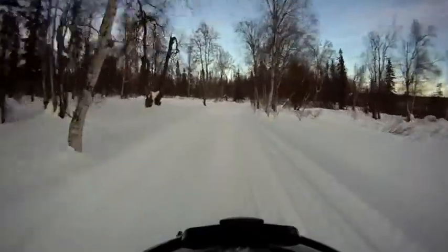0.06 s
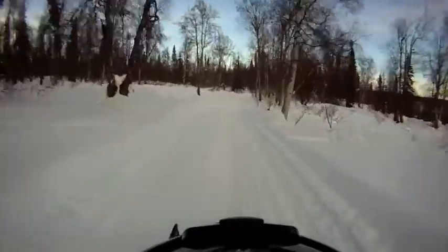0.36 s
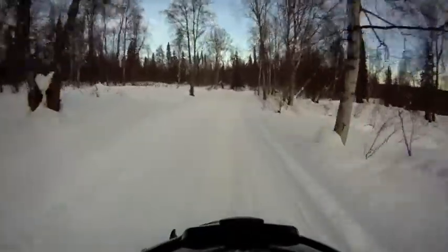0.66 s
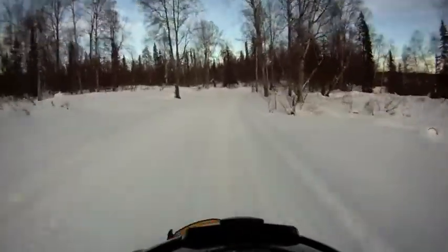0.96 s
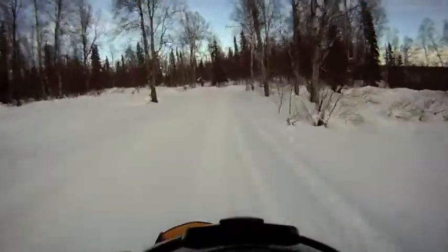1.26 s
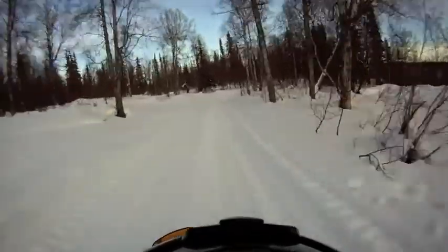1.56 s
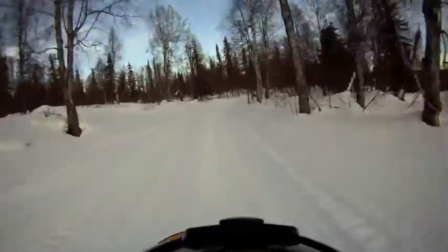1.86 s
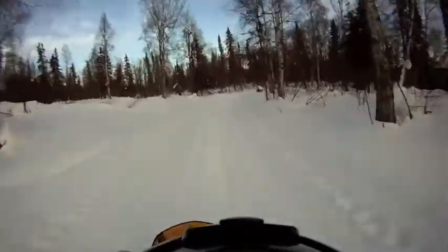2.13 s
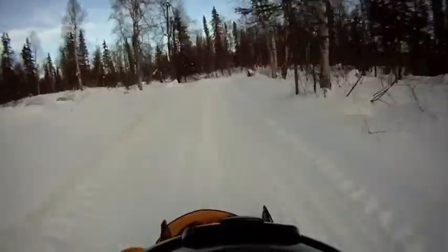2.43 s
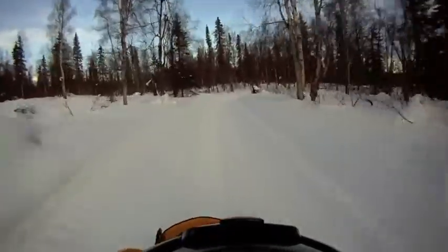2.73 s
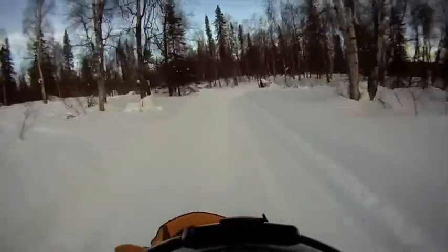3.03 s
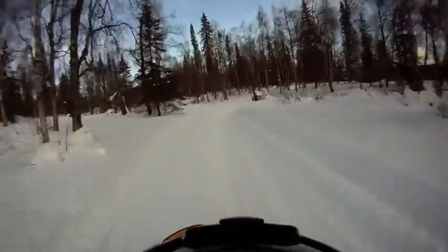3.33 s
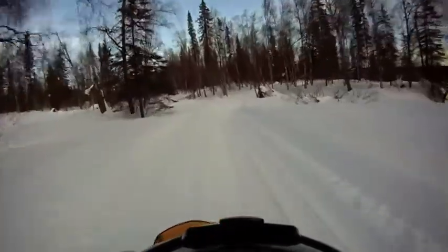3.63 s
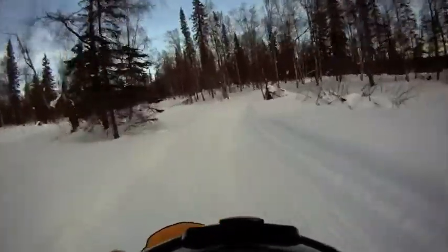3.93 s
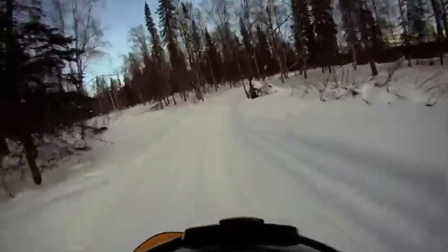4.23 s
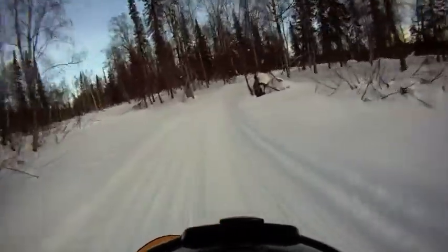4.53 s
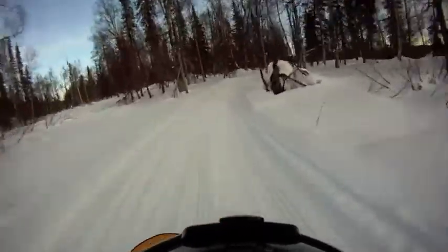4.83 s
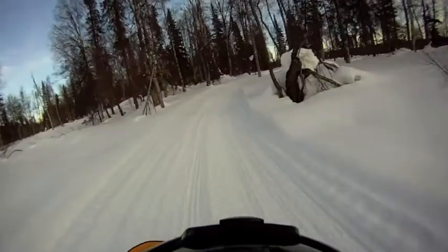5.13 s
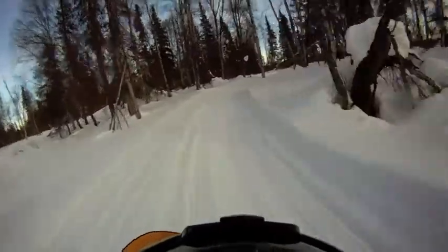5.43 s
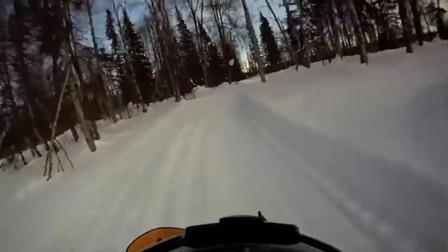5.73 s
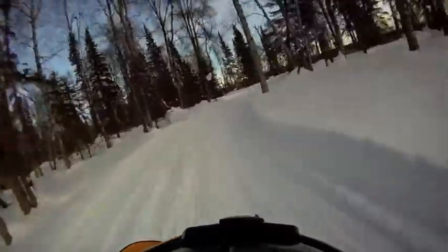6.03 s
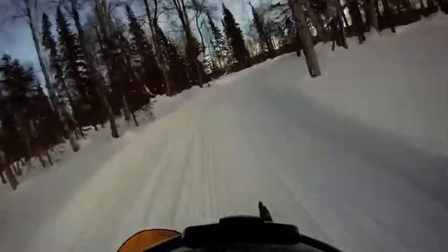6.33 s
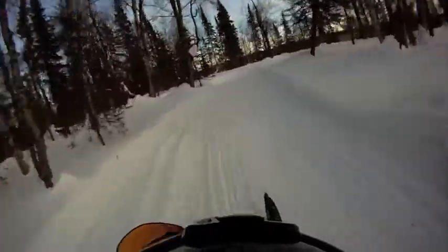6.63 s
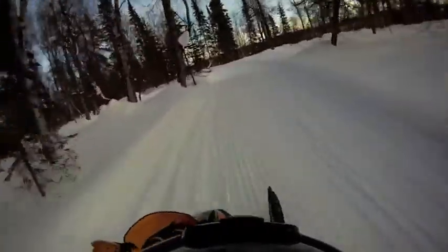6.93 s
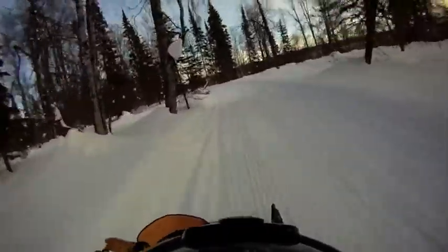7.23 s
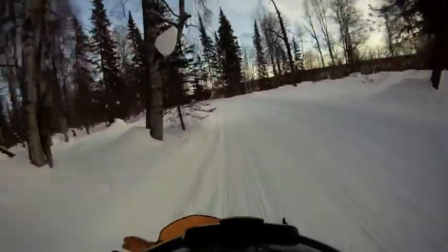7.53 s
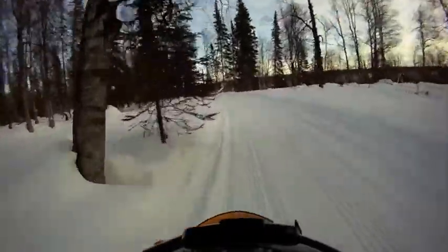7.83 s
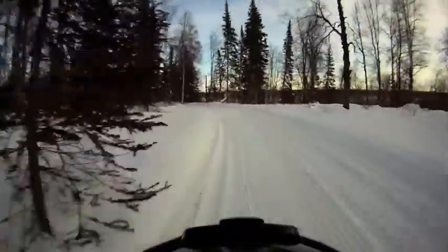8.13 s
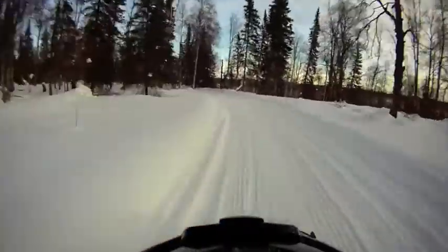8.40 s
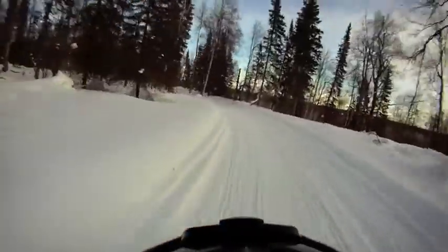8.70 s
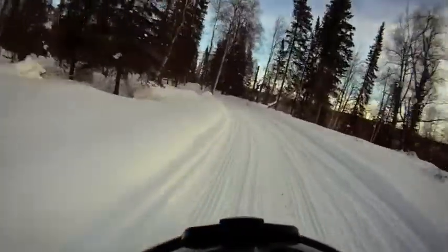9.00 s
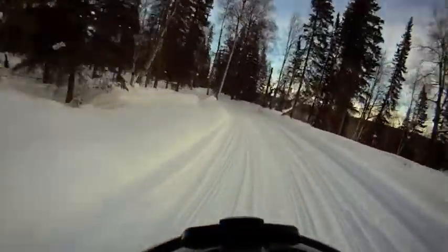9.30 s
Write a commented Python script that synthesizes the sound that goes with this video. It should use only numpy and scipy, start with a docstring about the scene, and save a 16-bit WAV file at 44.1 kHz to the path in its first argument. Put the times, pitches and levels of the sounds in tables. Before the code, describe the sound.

A snowmobile is already at trail speed, heard close from the rider's seat. The rubber track drones and the two-stroke engine buzzes, their tones beating against each other, inside a roar of churned snow and low wind buffeting. A thin hiss and sizzle lie on top throughout. Dull bumps thump the microphone irregularly from the start until about 6 seconds. The pitch sinks slowly, then faster from about 5 seconds as the machine slows for a bend, reaching its lowest near 7 seconds. The hood gives low booms around 4.8, 5.6 and 6.8 seconds, and the chassis and skis knock briefly near 5.4 and 7 seconds. Then the throttle opens, with one short intake snarl at about 7.5 seconds. The engine turns raspier and climbs in pitch, and the machine runs on, slower than at first and with lighter wind, until about 9.5 seconds.

```python
"""Track drone, two-stroke buzz and a roar of wind and snow: a snowmobile, heard from the rider's seat.
It runs along a packed forest trail, slows for a bend, then pulls away with one intake snarl.
Rubber track and engine each make a series of tones, beating where they cross.
Bumps thump the camera, the hood booms, chassis and skis knock.
The small camera samples at 12 kHz and holds each sample, which adds a thin sizzle."""
import sys
import numpy as np
from scipy import signal
from scipy.fft import rfft, irfft, next_fast_len
from scipy.io import wavfile

SR = 44100
rng = np.random.default_rng(int(sys.argv[2]) if len(sys.argv) > 2 else 0)


def wrap_up_sound(samples):
    """Save the sound to the file named by the first command line argument, as 16-bit audio."""
    columns = np.atleast_2d(samples).T
    # keep every value between -1 and 1, then stretch to whole-number steps
    tamed = np.clip(columns, -1, 1)
    steps = np.round(tamed * 32767).astype(np.int16)
    wavfile.write(sys.argv[1], SR, steps)


N = 417170
TIME_S = np.arange(N) / SR
CRUISE_LUG_HZ = 145

# track speed (time [s], lug rate [Hz])
LUG_RATE = [(0.0, 155.0), (0.4, 153.0), (1.17, 148.8), (2.15, 145.5), (3.15, 139.4), (3.71, 132.6),
            (4.59, 129.2), (5.01, 124.2), (5.57, 113.0), (6.53, 99.0), (6.92, 90.8), (7.1, 89.8),
            (7.35, 91.0), (8.52, 103.9), (8.71, 104.6), (9.46, 106.8)]
# engine speed (time [s], crank rate [Hz])
CRANK_RATE = [(0.0, 106.8), (0.61, 102.8), (1.21, 101.0), (2.1, 102.1), (3.19, 100.5), (3.48, 95.1),
              (3.84, 97.3), (4.55, 96.8), (5.46, 87.4), (6.22, 90.6), (6.35, 89.8), (6.95, 81.8),
              (7.2, 87.9), (7.35, 89.6), (7.67, 97.0), (8.35, 100.0), (9.03, 96.3), (9.46, 96.1)]
# cruise, coast, open up (time [s], throttle [0-1])
THROTTLE = [(0.0, 0.08), (3.0, 0.37), (4.6, 0.18), (5.2, 0.04), (6.3, 0), (6.92, 0.5), (7.6, 0.98),
            (8.3, 0.7), (9.46, 0.57)]
# track overtones (multiple of lug rate [-], level [dB])
TRACK_ORDERS = [(3, -16), (5, -4.5), (6, 0.5), (7, -6.5), (8, -10.5), (9, -13.5)]
# body resonances (frequency [Hz], gain [dB])
TUNNEL_RESPONSE = [(90, -12), (125, -1.5), (150, 4), (300, 7.5), (520, 1), (655, 2.5), (715, -14),
                   (820, -13), (920, -12), (1400, -19.5)]
CHASSIS_RESPONSE = [(165, -3), (183, -6.5), (198, 0.5), (215, -2.5), (237, -6), (262, -3), (310, -9.5),
                    (360, -9), (410, -4.5), (465, -15.5), (497, -3), (530, -18), (565, -11.5), (610, -7)]
PIPE_RESPONSE = [(95, -4), (290, -14), (390, -6.5), (420, 6), (490, -5.5), (585, 4), (680, -15), (780, -20)]
RASP_RESPONSE = [(780, 0), (900, 5), (1060, -13), (1230, 0), (1480, -5.5), (1620, -11), (1790, -3),
                 (1900, -22), (2100, -1.5), (2350, -12.5), (2700, -5.5), (2920, -8.5), (3150, -14)]
AIRBOX_RESPONSE = [(720, -14), (850, -7), (930, 1), (980, 0), (1050, -19), (1290, -15), (1400, -28),
                   (1540, -20), (1700, -28), (1850, -21), (2100, -23), (2650, -29), (2900, -15),
                   (3150, -32)]
# exhaust rasp (time [s], level [dB])
RASP_LEVEL = [(0.0, -42), (3.0, -50), (4.4, -47), (6.8, -45), (7.5, -38.5), (7.9, -41.5), (8.4, -41.5),
              (8.8, -48), (9.46, -46)]
# noise spectra (frequency [Hz], relative density [dB])
WIND_SPECTRUM = [(12, -21), (25, -2), (50, 4), (75, 5.5), (130, 0), (220, -3.5), (400, -39.5)]
SNOW_SPECTRUM = [(70, -15), (130, 0.5), (200, 0.5), (330, 2.5), (420, 2.5), (520, 1.5), (620, -1),
                 (720, -6.5), (850, -16), (1050, -22.5), (1500, -39.5)]
HISS_SPECTRUM = [(600, -15.5), (1000, -4.5), (1270, -4), (1600, -6.5), (1900, -0.5), (2060, -10),
                 (2300, -4), (2800, 1), (3350, -11), (3700, -8.5), (4300, -18.5), (4800, -14),
                 (5600, -21.5), (6500, -1.5)]
# swells and dips in the snow roar, hiss and wind
# (time [s], snow and hiss gain [dB], wind gain [dB], half length [s])
SURGES = [(0.126, 1.5, -5, 0.17), (1.6, 2, 0, 0.084), (2.937, 4, 3, 0.041), (3.2, -0.5, 4.5, 0.13),
          (4.453, 0, 0, 0.28), (5.197, 2.5, 3.5, .18), (5.906, 2, 3, 0.24), (7.345, 3, 1, 0.41),
          (8.5, -2, -2, .6)]
# hood booms (time [s], level [dB], half length [s])
HOOD_BOOMS = [(1.206, -26, 0.15), (4.777, -21, 0.11), (5.56, -17.5, .22), (6.807, -18.5, 0.14),
              (7.36, -25, 0.17), (9.4, -25, 0.086)]
# trail bumps (time [s], peak [dB])
BUMPS = [(.311, -1), (.335, -2), (.924, -5), (1.274, 0), (1.77, -5), (2.355, -2.5), (3.043, -2.5),
         (3.097, -2), (3.305, -3), (4.082, -2.5), (5.362, -2), (5.946, -2)]
# chassis and ski knocks (time [s], level [dB], ring [Hz], width [Hz], half length [s])
KNOCKS = [(4.45, -48, 2200, 700, .2), (5.335, -46, 2800, 1800, .025), (5.357, -31, 2700, 1400, .005),
          (5.358, -46, 5300, 700, .005), (6.53, -51, 5200, 1500, .003), (6.962, -33, 1580, 300, .006),
          (6.96, -32, 2450, 1100, .004), (7.85, -44, 2200, 250, .07)]


def from_db(db):
    """Decibels to gain."""
    return 10 ** (np.asarray(db) / 20)


def unit_rms(x):
    """Scale to rms 1."""
    return x / np.sqrt(np.mean(x ** 2) + 1e-20)


def curve(points):
    """Time table read at every sample."""
    return np.interp(TIME_S, *np.transpose(points))


def db_at(points, hz):
    """Spectrum read on a log-frequency axis."""
    points_hz, db = np.transpose(points)
    return np.interp(np.log(hz), np.log(points_hz), db)


def swell(at_s, half_s):
    """Gaussian rise and fall, height 1."""
    return np.exp(-((TIME_S - at_s) / half_s) ** 2)


def drift(rate_hz):
    """Smooth random wander, rms 1."""
    hop, settle = 40, 2000
    pole = np.exp(-2 * np.pi * rate_hz * hop / SR)
    white = rng.standard_normal(N // hop + settle + 2)
    slow = signal.lfilter([1], [1, -2 * pole, pole * pole], white)[settle:]
    return np.interp(np.arange(N) / hop, np.arange(len(slow)), unit_rms(slow))


def noise(spectrum):
    """Shaped noise, rolled off above the last point; rms 1."""
    size = next_fast_len(N)
    hz = np.maximum(np.arange(size // 2 + 1) * SR / size, 1)
    gain = from_db(db_at(spectrum, hz)) * np.minimum(1, spectrum[-1][0] / hz) ** 2
    return unit_rms(irfft(rfft(rng.standard_normal(size)) * gain, size)[:N])


def resonant_noise(hz, width_hz):
    """Noise twice through one resonance; rms 1."""
    radius = np.exp(-np.pi * width_hz / SR)
    section = [1, 0, -1, 1, -2 * radius * np.cos(2 * np.pi * hz / SR), radius * radius]
    return unit_rms(signal.sosfilt([section, section], rng.standard_normal(N)))


def phase_rad(hz, wobble, wobble_hz):
    """Running phase of a slightly unsteady rate."""
    return 2 * np.pi * np.cumsum(hz * (1 + wobble * drift(wobble_hz))) / SR


def tone(rad, rough, flutter_hz):
    """One partial, fluttering in level and phase; rms 1."""
    rad = rad + rng.uniform(0, 2 * np.pi)
    in_phase = (1 + rough * drift(flutter_hz)) * np.sin(rad)
    quadrature = rough * drift(flutter_hz) * np.cos(rad)
    return (in_phase + quadrature) / np.sqrt(.5 + rough ** 2)


def partials(rad, hz, orders, response, rough):
    """Harmonics (multiple, level [dB]) weighted by a body's response; rms 1."""
    return unit_rms(sum(from_db(db + db_at(response, k * hz)) * tone(k * rad, rough, flutter_hz=13)
                        for k, db in orders))


def track(lug_hz, throttle):
    """Lugs slap over the wheels; tunnel and chassis lift tones that pass their resonances."""
    rad = phase_rad(lug_hz, wobble=.0012, wobble_hz=5.2)
    slap_db = -27.5 + db_at(TUNNEL_RESPONSE, lug_hz)
    drone_db = -17.5 + 3 * throttle + db_at(CHASSIS_RESPONSE, 2 * lug_hz)  # grows with load
    whine_db = -14.5 - 4.5 * throttle + db_at(CHASSIS_RESPONSE, 4 * lug_hz)  # taut belt rings less
    rattle_db = -28.5 - 10.5 * throttle - 8 * np.log2(lug_hz / CRUISE_LUG_HZ)  # fast belt rattles less
    slap = from_db(slap_db) * tone(rad, rough=.35, flutter_hz=9.2)
    drone = from_db(drone_db) * tone(2 * rad, rough=.075, flutter_hz=6.6)
    whine = from_db(whine_db) * tone(4 * rad, rough=.23, flutter_hz=5)
    rattle = from_db(rattle_db) * partials(rad, lug_hz, TRACK_ORDERS, TUNNEL_RESPONSE, rough=.22)
    return slap + drone + whine + rattle


def engine(crank_rad, crank_hz, throttle):
    """Two firings a turn make the main tone; the exhaust pipe adds low harmonics and a rasp."""
    low = [(k, 0) for k in (1, 3, 4, 5, 6, 7)]
    high = [(k, 0) for k in range(8, 35)]
    firing_db = -28.5 + 9.5 * throttle + db_at(CHASSIS_RESPONSE, 2 * crank_hz)
    firing = from_db(firing_db) * tone(2 * crank_rad, rough=.15, flutter_hz=8)
    pipe = from_db(-29 + 11 * throttle) * partials(crank_rad, crank_hz, low, PIPE_RESPONSE, rough=.29)
    rasp = from_db(curve(RASP_LEVEL)) * partials(crank_rad, crank_hz, high, RASP_RESPONSE, rough=.25)
    return firing + pipe + rasp


def wind(speed_octaves):
    """Air buffets the microphone, harder with speed."""
    surge_db = sum(db * swell(at_s, half_s) for at_s, _, db, half_s in SURGES)
    return from_db(-21.5 + 9 * speed_octaves + surge_db + .65 * drift(6.2)) * noise(WIND_SPECTRUM)


def snow(speed_octaves, surge_db):
    """Churned snow roars under the track."""
    return from_db(-19 + 4.5 * speed_octaves + surge_db + 1.45 * drift(12)) * noise(SNOW_SPECTRUM)


def machinery_hiss(crank_rad, speed_octaves, surge_db):
    """Machinery hisses, throbbing once a turn; a panel rings in it."""
    panel = from_db(-12) * resonant_noise(hz=2056, width_hz=140)
    gain_db = -38.5 + 4 * speed_octaves + surge_db + .88 * drift(21)
    throb = 1 + .083 * np.cos(crank_rad)
    return from_db(gain_db) * (noise(HISS_SPECTRUM) + panel) * throb


def hood(hum_db=-34.5):
    """One low hood resonance hums and swells into booms."""
    booms = sum(from_db(db) * swell(at_s, half_s) for at_s, db, half_s in HOOD_BOOMS)
    return (from_db(hum_db) + booms) * resonant_noise(hz=96.3, width_hz=19.4)


def bumps(push_s=.0018):
    """Each bump gives the microphone one dull push, with a slight undershoot either side."""
    return sum(from_db(db) * (1 - ((TIME_S - at_s) / push_s) ** 2) * swell(at_s, push_s)
               for at_s, db in BUMPS)


def knocks():
    """Chassis and skis knock and scrape: noise bursts, one resonance each."""
    return sum(from_db(db) * swell(at_s, half_s) * resonant_noise(hz, width_hz)
               for at_s, db, hz, width_hz, half_s in KNOCKS)


def intake_snarl(crank_rad, crank_hz, at_s=7.46, hold_s=.14, rise_db_per_s=46, fall_db_per_s=129):
    """High crank harmonics through the airbox swell once near full throttle, hold and drop."""
    before_s = np.maximum(at_s - TIME_S, 0)
    after_s = np.maximum(TIME_S - at_s - hold_s, 0)
    level_db = -30.5 - rise_db_per_s * before_s - fall_db_per_s * after_s
    high = [(k, 0) for k in range(8, 35)]
    return from_db(level_db) * partials(crank_rad, crank_hz, high, AIRBOX_RESPONSE, rough=.18)


def limiter(x, threshold_db=-5.5, release_db_per_s=50, attack_s=.0021):
    """Peaks over the threshold pull the gain down fast; it creeps back."""
    over_db = np.maximum(20 * np.log10(np.abs(x) + 1e-9) - threshold_db, 0)
    ramp_db = release_db_per_s * TIME_S
    cut_db = np.maximum.accumulate(over_db + ramp_db, axis=1) - ramp_db
    pole = np.exp(-1 / (attack_s * SR))
    return x * from_db(-signal.lfilter([1 - pole], [1, -pole], cut_db))


def scene():
    """Mono mix; all sources ride with the microphone."""
    lug_hz, crank_hz, throttle = curve(LUG_RATE), curve(CRANK_RATE), curve(THROTTLE)
    crank_rad = phase_rad(crank_hz, wobble=.0011, wobble_hz=12)
    speed_octaves = np.log2(lug_hz / CRUISE_LUG_HZ)
    surge_db = sum(db * swell(at_s, half_s) for at_s, db, _, half_s in SURGES)
    drive = track(lug_hz, throttle) + engine(crank_rad, crank_hz, throttle)
    rush = wind(speed_octaves) + snow(speed_octaves, surge_db)
    hiss = machinery_hiss(crank_rad, speed_octaves, surge_db)
    return (drive + rush + hiss + hood() + bumps() + knocks() + intake_snarl(crank_rad, crank_hz))[None]


def record(dry):
    """Limiter, then 12 kHz sample-and-hold mirrors the sound around 12 kHz; top cut at 15.2 kHz."""
    padded = np.pad(limiter(dry), ((0, 0), (0, 441)), "reflect", reflect_type="odd")
    at_12khz = signal.resample_poly(padded, 40, 147, axis=1)
    at_12khz = signal.sosfilt(signal.butter(2, 5600, fs=12000, output="sos"), at_12khz)
    held_48khz = np.repeat(at_12khz, 4, axis=1)
    held = signal.resample_poly(held_48khz, 147, 160, axis=1)[:, :N]
    return signal.sosfilt(signal.ellip(14, .2, 90, 15200, fs=SR, output="sos"), held)


dry = scene()
out = record(dry)
wrap_up_sound(out)
```